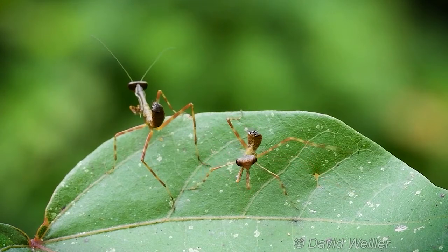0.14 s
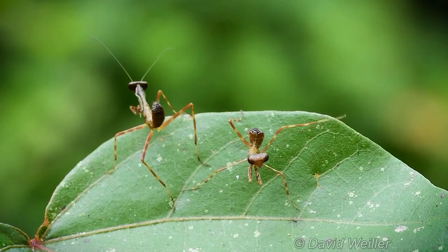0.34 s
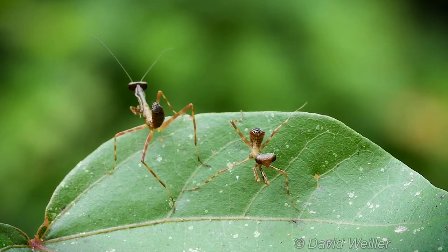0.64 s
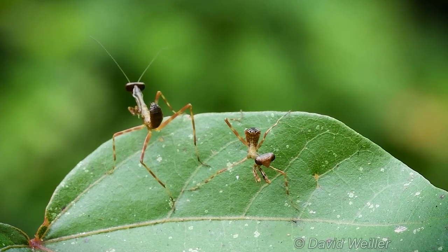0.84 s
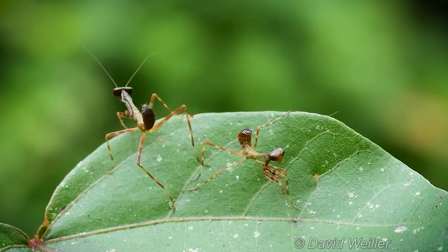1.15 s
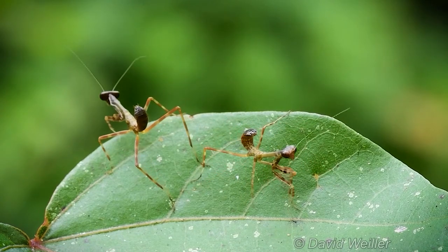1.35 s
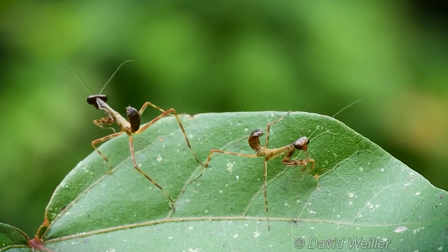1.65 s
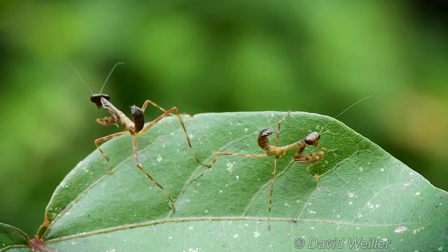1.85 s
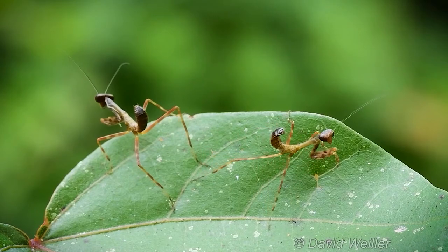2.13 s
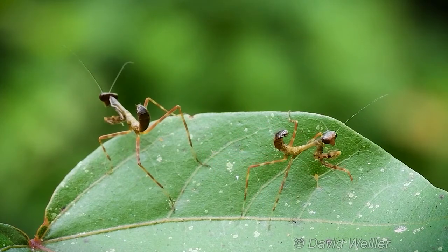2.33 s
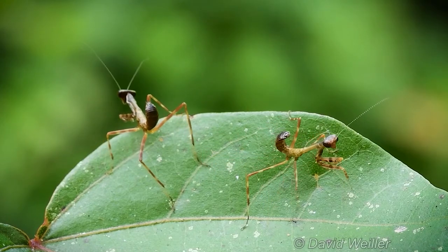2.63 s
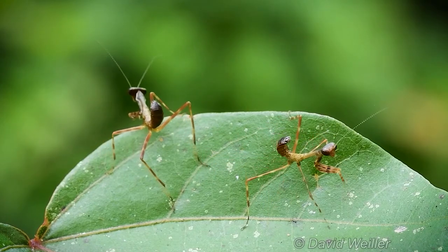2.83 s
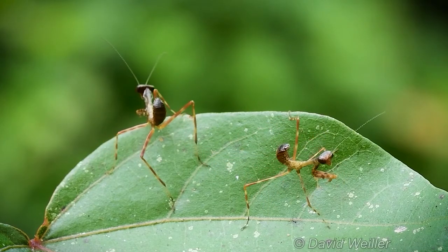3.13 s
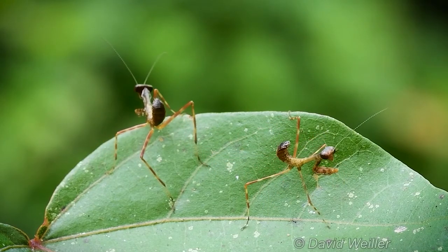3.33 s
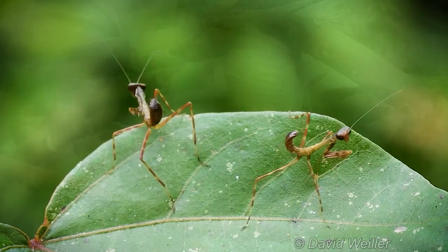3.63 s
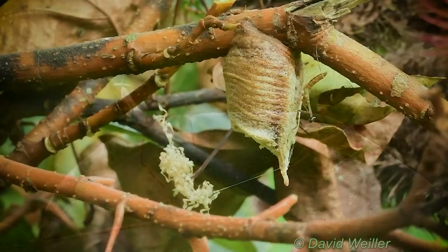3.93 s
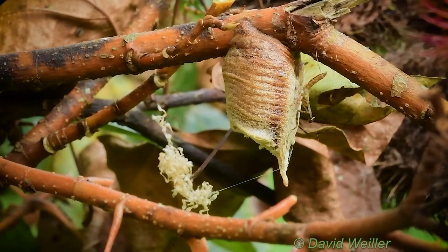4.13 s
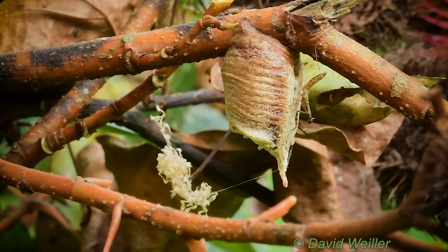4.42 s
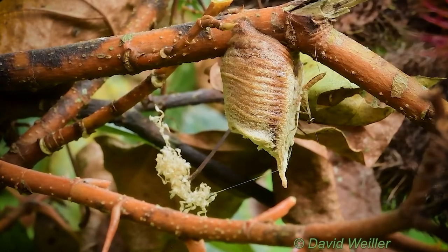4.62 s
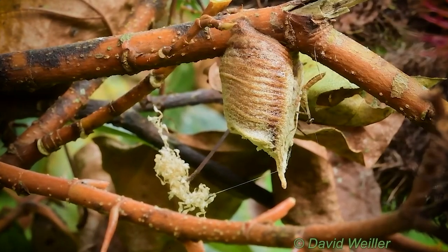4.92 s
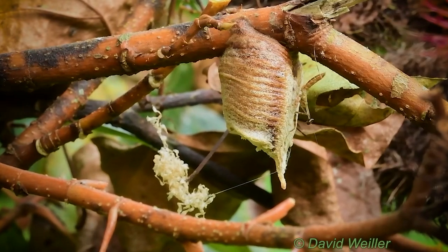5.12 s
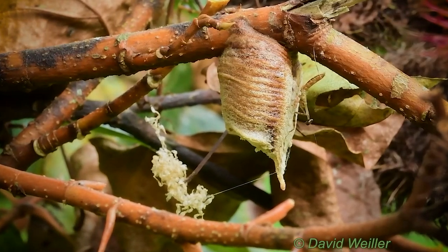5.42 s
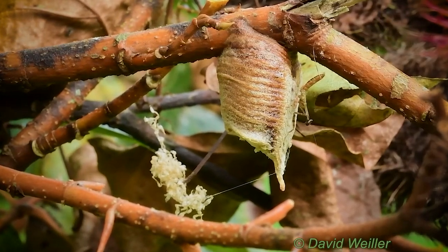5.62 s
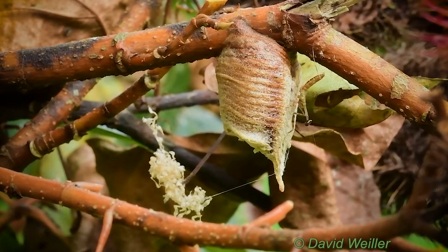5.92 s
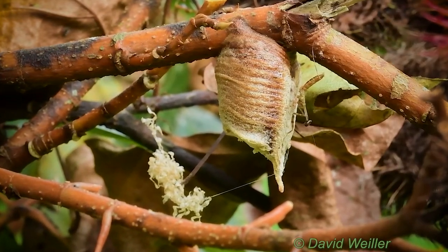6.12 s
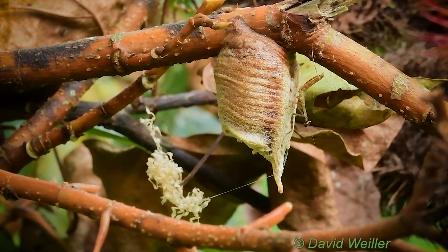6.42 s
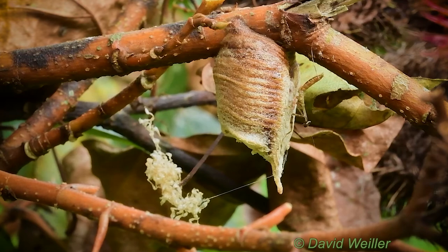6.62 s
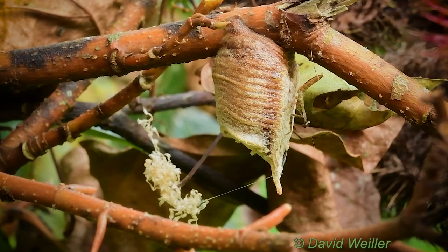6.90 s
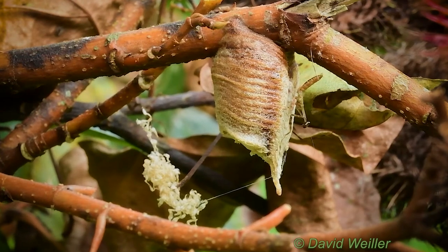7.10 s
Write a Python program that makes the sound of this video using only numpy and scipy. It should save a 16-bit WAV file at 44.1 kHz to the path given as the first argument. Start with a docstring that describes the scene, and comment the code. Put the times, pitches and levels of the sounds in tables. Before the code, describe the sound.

Quiet leafy hiss with faint insects. A harsh, loud bird call bursts out close to the microphone in the first second, followed by brief yelps; a quick throat rattle and more yelping come around three seconds. Behind it, a hoarse bird on the left chacks sparsely, then persistently, while mellow hoots, falling and rising whistles, buzzy notes and high frog trills echo through the trees to the end.

```python
"""Rainforest birds and frogs

A near bird yelps (rough harmonic voice), clicks (ringing noise bursts) and rasps (irregular pulses, air, squeal).
Further off to the left another bird repeats a hoarse chack: three yelps run together.
Around them: arched whistles of few partials, fluttering (phase-modulated) buzzes, frog trills (trains of
falling notes) and faint gliding slurs, with echoes, over filtered-noise hiss of leaves and insects.
Two narrow gaps sweep slowly up and down through the treble; the top is cut."""
import sys
import numpy as np
from scipy import signal
from scipy.fft import rfft, irfft, next_fast_len
from scipy.io import wavfile
from scipy.ndimage import uniform_filter1d

SR = 44100
rng = np.random.default_rng(int(sys.argv[2]) if len(sys.argv) > 2 else 0)


def materialize(psi):
    """Save the field psi as 16-bit PCM at rate SR to the path in sys.argv[1].

    A 1-D psi becomes a single channel; in a 2-D psi each row is a channel.
    """
    bounded = np.clip(np.atleast_2d(psi).T, -1, 1)
    quanta = np.round(bounded * 32767).astype(np.int16)
    wavfile.write(sys.argv[1], SR, quanta)


N = 319989

# forest hiss spectrum: (frequency [Hz], relative level [dB])
HISS_SPECTRUM = [(15, -57), (25, -20), (193, -15.5), (246, -17), (421, -9.5), (597, -17.5), (1240, -2),
                 (1410, -6), (1850, -6.5), (3000, -9.5), (3620, -9.5), (4610, -12.5), (5140, -13),
                 (6720, -16.5), (15500, -28)]
HISS_DB, HISS_WIDTH = -69, .35  # width: noise independent per side, relative to the common noise

# faint distant slurs: (start [s], length [s], first pitch [Hz], last pitch [Hz], level [dB])
SLURS = [(1.02, 0.068, 960, 820, -67), (1.842, .13, 2850, 3500, -64.5), (1.958, .2, 3420, 3520, -71.5),
         (2.263, 0.11, 3850, 3630, -64), (3.947, 0.081, 7340, 6650, -73.5), (4.0, 0.13, 4390, 4760, -73.5),
         (4.115, 0.034, 4480, 3820, -64.5), (4.125, .08, 7420, 6650, -75.5),
         (4.231, 0.092, 4270, 3960, -62), (4.388, 0.12, 4320, 4500, -68), (5.34, 0.071, 3060, 2110, -56),
         (6.998, .11, 2340, 2840, -68)]

# frog trills: (start [s], length [s], starting note rate [1/s], first pitch [Hz], last pitch [Hz],
# fall within a note [Hz], sharpness of a note's swell [power], level [dB], loudest point [share of length],
# fade towards the farther end [dB], left-right [dB])
TRILLS = [(2.89, .028, 75, 5730, 5670, 498, 4.7, -53, 0.46, 0, 4),
          (3.244, 0.26, 51, 7110, 7200, 199, 2.2, -60.5, 0.78, 8, 11),
          (4.247, 0.71, 35.1, 3526, 3883, 1000, 1.1, -57, 0.68, 7, 6.5),
          (6.326, .79, 40.3, 4280, 4106, 425, 3.7, -47.5, 0.12, 7, -8)]
TRILL_SLOWING = .05  # share of its rate lost by the end

# buzzing whistles: (start [s], length [s], pitch [Hz], flutter rate [Hz], final flutter depth [rad],
# level before fade [dB], left-right [dB])
BUZZES = [(3.567, 0.27, 3647, 310, 1.07, -45.5, 7.5), (3.617, .25, 3914, 42.4, 1.6, -52.5, 7),
          (5.51, 0.49, 4582, 328, 1.1, -47, -6.5)]

# whistling birds, one table each: (start [s], length [s], top pitch [Hz], crest [share of length], level [dB])
HOOTS = [(1.231, .17, 1370, .66, -42.5), (1.48, 0.13, 1342, 0.66, -43), (2.052, 0.116, 1356, 0.808, -40.5),
         (4.504, 0.15, 1353, 0.64, -37)]
FALLING_WHISTLES = [(1.854, .13, 1568, 0.35, -50.5), (5.135, .13, 1537, 0.21, -49),
                    (5.859, .14, 1495, 0.21, -49), (6.089, .13, 1245, 0.16, -67.5),
                    (6.471, .091, 1213, 0.19, -65.5), (6.83, 0.071, 1170, .3, -66)]
RISING_WHISTLES = [(4.193, 0.1, 1740, 0.5, -51), (4.813, 0.11, 1760, 0.76, -53.5),
                   (5.48, .11, 1773, 0.48, -56), (6.68, 0.16, 1785, 0.71, -57)]
# their partials: (multiple of the pitch, level [dB])
HOOT_PARTIALS = [(1, -3.5), (2, -23), (3, -34)]
FALLING_PARTIALS = [(1, 4), (2, -19), (3, -39.5)]
RISING_PARTIALS = [(.5, -23.5), (1, -3), (1.5, -17.5), (2, -19.5), (2.5, -22)]

# near bird's yelps, one arch of pitch each: (start [s], length [s], foot [Hz], top [Hz], crest [share of length],
# level [dB], attack [s], release [s], overtones at the crest [dB], overtones on the flanks [dB],
# roughness at the top [0-1])
YELPS = [ (0.212, 0.082, 960, 2092, 0.84, -34.5, 0.043, 0.0046, -5, 7, 0.1),
         (.89, 0.041, 700, 1528, 0.48, -16.5, 0.024, 0.021, -27.5, -7, 0.04),
         (.945, 0.039, 762, 1240, 0.43, -20, 0.0052, 0.0076, 8.5, 21, 0.3),
         (2.789, 0.047, 1642, 1799, .78, -22.5, 0.065, 0.0061, 1, 1, 0),
         (3.124, 0.07, 853, 1760, .6, -20, .021, 0.023, 6.5, 5.5, 0.09)]
# the three yelps of a chack: columns as above; start and level relative to the chack's,
# start and length before its stretch
CHACK_PARTS = [ (-.005, .038, 879.6, 1338, .55, -1.64, 0.013, 0.0035, 3, 9.6, 0.036),
               (.028, .025, 952.5, 1474, 0.518, 1.8, 0.0058, .006, 9.6, 12, 0.12),
               (.048, .058, 1036, 1420, .13, -2.1, 0.004, 0.043, 2.8, 5, .3)]
# chacks: (start [s], level [dB], time stretch [ratio], beak resonance [Hz])
CHACKS = [(1.289, -48.5, 1.014, 2300), (2.189, -53, 0.91, 3232), (2.571, -52.5, 0.93, 3240),
          (2.919, -54.5, 0.85, 3200), (4.537, -47, 1.02, 2250), (4.727, -46, 0.93, 2280),
          (5.066, -45, 1.036, 2200), (5.226, -46, 0.95, 2400), (5.312, -51, 0.85, 2970),
          (5.393, -46, 1.05, 3100), (5.579, -45.5, 1, 2960), (5.761, -45, 1.01, 2880),
          (5.961, -45, 0.92, 2914), (6.245, -45, 0.93, 3180), (6.455, -63.5, 1.06, 3320),
          (6.781, -44.5, 0.9, 2920), (7.156, -44.5, 1.02, 3300)]
FULL_CHACK_DB = -44
DULLING_DB_PER_OCTAVE = .45  # slope lost per dB below a full chack
CHACK_AIR_DB = -15

SWELL_POWER, RELEASE_POWER = 1.7, 1.67  # curvature of a yelp's attack and release
FLANK_SHARE = .44  # share of the arch's height over which the flank overtones come in
FLANK_ROUGHNESS_PER_OCTAVE = .33  # gained below the top
# register break on the rise: place [share of the rise], half width [s], changes per octave from foot to top
BREAK_AT, BREAK_S = .6, .0027
BREAK_DIP_DB, BREAK_ROUGHNESS, BREAK_OVERTONES_DB = 4, .62, 2.5
# one yelp ends by cracking into a hoarse scrap
CRACK_AT_S, CRACK_S, CRACK_HZ, CRACK_DB, CRACK_FADE_DB = 2.832, .025, 2120, -34, 14.5

# runs of throat clicks: (start [s], spacing [s], clicks [count], first level [dB], last level [dB])
CLICK_RUNS = [(.412, .0255, 3, -29.5, -25), (3.027, .0115, 9, -49, -23)]

# effort of the rasp: (time [s], level before RASP_GAIN_DB [dB])
RASP_EFFORT = [(0.46, -39.5), (0.466, -34), (0.484, -33.5), (0.528, -29), (0.648, -28), (0.666, -25),
               (0.72, -32), (0.79, -51.5)]
RASP_GAIN_DB = 1.5
RASP_PULSE_HZ, RASP_SWING_HZ, RASP_SWING_S = 463.5, 58, .107  # mean pulse rate, swing, swing period
# clear tones within the rasp: (start [s], length [s], mid-tone pitch [Hz], level [dB])
LOCKS = [(0.521, 0.028, 914.7, -26), (0.643, 0.034, 906, -27.5)]
# their harmonics: (multiple of the pitch, relative level [dB])
LOCK_HARMONICS = [(1, -12), (2, -10.5), (3, 0), (4, -7), (6, -3)]

# throat colours: (frequency [Hz], relative level [dB])
FAR_THROAT = [(600, -35), (900, 3.5), (1250, 8.5), (1600, -1.5), (2100, 6), (2900, 2.5), (3700, -5.5),
              (4500, -6), (5300, -8), (6400, -2), (7600, -17), (10000, -57)]
NEAR_THROAT = [(400, -21.5), (800, -10.5), (1300, -4), (2400, -9), (3500, -8), (4100, -7), (4800, -4.5),
               (5500, -4), (6800, -9), (8500, -22.5), (11000, -25), (15000, -30.5)]
CLICK_THROAT = [(400, -38.5), (750, -28.5), (1150, 4.5), (1900, -0.5), (2400, -4), (2900, 8.5), (3450, 4),
                (4000, -10.5), (4800, -1.5), (6500, -16), (9000, -29), (15000, -43)]
RASP_THROAT = [(150, -82), (250, -64), (457, -45.5), (837, -33), (1180, -22), (1360, -19), (2160, -13.5),
               (2660, -17.5), (3270, -6.5), (4620, -13.5), (5990, -9.5), (6760, -21.5), (12400, -42.5),
               (14200, -43.5), (15500, -95)]

# leaves ringing on around the near bird: (frequency [Hz], width [Hz], level [dB])
LEAF_RINGS = [(2200, 30, -15), (3500, 20, -16), (4170, 16, -1), (4850, 22, -4)]
CUTOFF_HZ = 15700


def from_db(db):
    """Decibels to gain."""
    return 10 ** (np.asarray(db) / 20)


def rms_one(x):
    """Scale to unit power."""
    return x / np.sqrt(np.mean(x ** 2) + 1e-20)


def gain_at(spectrum, hz):
    """Gain of a spectrum table at any frequency, interpolated over log frequency."""
    table_hz, table_db = np.transpose(spectrum)
    return from_db(np.interp(np.log(np.maximum(hz, 1)), np.log(table_hz), table_db))


def colour(x, spectrum):
    """Filter by a spectrum table; unit power."""
    length = x.shape[-1]
    size = next_fast_len(length)
    gain = gain_at(spectrum, np.fft.rfftfreq(size, 1 / SR))
    return rms_one(irfft(rfft(x, size) * gain, size)[..., :length])


def wobble(count, rate_hz):
    """Smooth random motion of spread 1: noise through a double-pole low-pass."""
    pole = np.exp(-2 * np.pi * rate_hz / SR)
    settle = SR // 10
    noise = rng.standard_normal(count + settle)
    return rms_one(signal.lfilter([1], [1, -2 * pole, pole * pole], noise)[settle:])


def progress(length_s):
    """Ramp from 0 to 1 along a note."""
    return np.linspace(0, 1, int(length_s * SR))


def phase_of(hz):
    """Running phase [rad] of a pitch curve."""
    return 2 * np.pi * np.cumsum(hz) / SR


def add(track, start_s, sound, pan_db=0):
    """Mix a mono sound into a stereo track; positive pan is left."""
    at = max(round(start_s * SR), 0)
    part = sound[:max(N - at, 0)]
    sides = from_db(np.array([[pan_db], [-pan_db]]) / 2)
    track[:, at:at + len(part)] += part * sides / sides.mean()


def background():
    """Soft noise hiss of foliage, with a thin band of distant insects."""
    hiss_noise = rng.standard_normal(N) + HISS_WIDTH * rng.standard_normal((2, N))
    hiss = colour(hiss_noise, HISS_SPECTRUM)
    insect_band = [(5000, -58), (5750, -12), (5900, -5.5), (6050, -22.0), (6900, -70.0)]
    insects = colour(rng.standard_normal((2, N)), insect_band)
    hiss_db = HISS_DB + .5 * wobble(N, 3.4)
    return hiss * from_db(hiss_db) + insects * from_db([[-83], [-88]])


def slurs():
    """Thin sine notes gliding from one pitch to another, deep in the forest."""
    out = np.zeros((2, N))
    for start_s, length_s, first_hz, last_hz, level_db in SLURS:
        u = progress(length_s)
        hz = first_hz * (last_hz / first_hz) ** u
        wave = np.sin(phase_of(hz * (1 + .0028 * wobble(len(u), 80))))
        swell = np.sin(np.pi * u)
        add(out, start_s, np.sqrt(2) * from_db(level_db) * swell * wave, pan_db=4.5)
    return out


def trills():
    """Frogs: fast trains of short notes, each falling in pitch; a train swells, fades and slows a little."""
    out = np.zeros((2, N))
    for (start_s, length_s, rate_hz, first_hz, last_hz, fall_hz, sharpness,
         level_db, crest, fade_db, pan_db) in TRILLS:
        along = progress(length_s)
        u = np.cumsum(rate_hz * (1 - TRILL_SLOWING * along)) / SR % 1  # place within a note
        hz = first_hz + (last_hz - first_hz) * along
        wave = np.sin(phase_of(hz + fall_hz * (.3 - u ** 2) + 25 * wobble(len(u), 150)))
        note = wave * np.abs(np.sin(np.pi * u)) ** sharpness
        from_crest = np.abs(along - crest) / max(crest, 1 - crest)
        swell = from_db(level_db - fade_db * from_crest) * signal.windows.tukey(len(u), .08)
        add(out, start_s, np.sqrt(2) * swell * note, pan_db)
    return out


def buzzes():
    """Held whistles whose phase-modulating flutter deepens as they fade."""
    out = np.zeros((2, N))
    for start_s, length_s, hz, flutter_hz, depth_rad, level_db, pan_db in BUZZES:
        u = progress(length_s)
        flutter = phase_of(flutter_hz * (1 + .085 * wobble(len(u), 40)))
        carrier = phase_of(hz * (1 + .005 * wobble(len(u), 30)))
        wave = np.sin(carrier + depth_rad * u * np.sin(flutter))
        swell = signal.windows.tukey(len(u), .35) * from_db(-8 * u + .94 * wobble(len(u), 40))
        add(out, start_s, np.sqrt(2) * from_db(level_db) * swell * wave, pan_db)
    return out


def arch(u, first_hz, top_hz, last_hz, crest, bend):
    """Pitch along a note (u from 0 to 1): it rises, rounds off at the crest and falls away."""
    crest = np.clip(crest, .05, .95)
    rise = np.sin(np.pi / 2 * np.minimum(u / crest, 1))
    fall = (np.maximum(u - crest, 0) / (1 - crest)) ** bend
    return first_hz + (top_hz - first_hz) * rise - (top_hz - last_hz) * fall


def whistler(notes, partials, first, last, bend, lateness, pan_db):
    """Nearly pure arched notes that swell and stop short; first and last are shares of the top pitch."""
    out = np.zeros((2, N))
    for start_s, length_s, top_hz, crest, level_db in notes:
        u = progress(length_s)
        hz = arch(u, first * top_hz, top_hz, last * top_hz, crest, bend)
        phase = phase_of(hz * (1 + .0015 * wobble(len(u), 65)))
        # multiples held to whole or half harmonics
        wave = sum(from_db(db) * np.sin(round(2 * k) / 2 * phase) for k, db in partials)
        swell = np.abs(np.sin(np.pi * u ** lateness)) ** .46
        add(out, start_s, np.sqrt(2) * from_db(level_db) * swell * wave, pan_db)
    return out


def whistles():
    """Three birds on the left: one hoots on an almost level pitch, one slides down, one swoops up."""
    hoots = whistler(HOOTS, HOOT_PARTIALS, first=.92, last=.98, bend=1.54, lateness=2.42, pan_db=5.3)
    falling = whistler(FALLING_WHISTLES, FALLING_PARTIALS,
                       first=.87, last=.91, bend=1.25, lateness=2.36, pan_db=7)
    rising = whistler(RISING_WHISTLES, RISING_PARTIALS,
                      first=.79, last=.94, bend=3.3, lateness=1.26, pan_db=13.5)
    return hoots + falling + rising


def syrinx(controls, throat, jitter, flutter_hz, doubling, slope_db, air_db, count=20):
    """A harmonic voice; roughness shakes its pitch and doubles its period, which brings in half harmonics."""
    hz, level_db, overtone_db, rough = controls
    size = len(hz)
    hz = uniform_filter1d(hz, SR // 300) * (1 + jitter * rough ** 2 * wobble(size, flutter_hz))
    k = np.arange(2, count + 2)[:, None] / 2  # harmonic number, in halves from 1
    weight = gain_at(throat, k * hz) * (k * hz < SR / 2)
    weight = weight * np.where(k % 1, doubling * rough, 1)
    tilt_db = slope_db * np.log2(np.maximum(k / 2, 1))
    weight = weight * from_db(np.minimum(2 * (k - 1), 1) * overtone_db + tilt_db)
    weight = weight / np.sqrt(np.sum(weight ** 2, axis=0) / 2)
    # the higher a harmonic, the more its phase frays
    fray = np.clip(.43 * (k - 1.5), 0, 1.5) * np.array([wobble(size, 170) for _ in k])
    phase = k * phase_of(hz) + fray + rng.uniform(0, 2 * np.pi, k.shape)
    wave = np.sum(weight * np.sin(phase), axis=0)
    air = colour(rng.standard_normal(size), throat) * from_db(air_db) * np.sqrt(np.abs(rough))
    shake = 1 + .31 * rough * wobble(size, 250)
    return (wave + air) * from_db(level_db) * shake * signal.windows.tukey(size, .06)


def yelp(length_s, foot_hz, top_hz, crest, level_db, attack_s, release_s, crest_db, flank_db, rough, bend):
    """Pitch, level, overtones and roughness of a yelp: rougher down the flanks, with a register break."""
    u = progress(length_s)
    hz = arch(u, foot_hz, top_hz, foot_hz, crest, bend)
    slack = (top_hz - hz) / (top_hz - foot_hz)
    edges = np.minimum([u * length_s / attack_s, (1 - u) * length_s / release_s], 1)
    opening, closing = np.sin(np.pi / 2 * edges)
    swell_db = 20 * np.log10(opening ** SWELL_POWER * closing ** RELEASE_POWER + 1e-6)
    # for a moment on the way up the voice dips, roughens and brightens; wide leaps break most
    breaking = np.exp(-((u - BREAK_AT * crest) * length_s / BREAK_S) ** 2) * np.log2(top_hz / foot_hz)
    overtone_db = crest_db + (flank_db - crest_db) * np.minimum(slack / FLANK_SHARE, 1)
    flank_roughness = FLANK_ROUGHNESS_PER_OCTAVE * np.log2(top_hz / hz)
    return (hz,
            level_db + swell_db - BREAK_DIP_DB * breaking,
            overtone_db + BREAK_OVERTONES_DB * breaking,
            rough + flank_roughness + BREAK_ROUGHNESS * breaking)


def chacks():
    """A clean rise, a rough break and a hoarse falling tail, varied each time; the open beak rings along."""
    out = np.zeros((2, N))
    for start_s, level_db, stretch, beak_hz in CHACKS:
        slope_db = -4.5 + DULLING_DB_PER_OCTAVE * (level_db - FULL_CHACK_DB)  # softer is duller
        for after_s, length_s, *note in CHACK_PARTS:
            hz, shape_db, overtone_db, rough = yelp(length_s * stretch, *note, bend=1.3)
            chance = rng.standard_normal(4)
            controls = (hz * (1 + .046 * chance[0]), shape_db + 1.5 * chance[1],
                        overtone_db + 6.3 * chance[2], rough)
            call = syrinx(controls, FAR_THROAT, jitter=.13, flutter_hz=273, doubling=3.27,
                          slope_db=slope_db, air_db=CHACK_AIR_DB)
            call = call + .96 * signal.lfilter(*signal.iirpeak(beak_hz, 6, fs=SR), call)
            part_s = start_s + after_s * stretch + .0012 * chance[3]
            add(out, part_s, from_db(level_db) * call, pan_db=6.0)
    return out


def clicks():
    """Runs of noise bursts that each ring for a few milliseconds in the throat."""
    out = np.zeros((2, N))
    t = np.arange(SR // 40) / SR
    snap = np.minimum(t / .001, 1) * (.8 * np.exp(-t / .0053) + .18 * np.exp(-t / .019))
    for start_s, spacing_s, count, first_db, last_db in CLICK_RUNS:
        # gain grows as the square of a straight ramp
        strengths = np.linspace(from_db(first_db / 2), from_db(last_db / 2), round(count)) ** 2
        for i, strength in enumerate(strengths):
            burst = colour(rng.standard_normal(len(t)), CLICK_THROAT)
            add(out, start_s + i * spacing_s, strength * burst * snap)
    return out


def crack():
    """Pitch, level, overtones and roughness of a voice that has broken: wholly rough and fading fast."""
    u = progress(CRACK_S)
    return np.full_like(u, CRACK_HZ), CRACK_DB - CRACK_FADE_DB * u, np.zeros_like(u), np.ones_like(u)


def yelps():
    """Arched notes of the near bird's syrinx, and the crack that ends one of them."""
    out = np.zeros((2, N))
    calls = [(start_s, yelp(*note, bend=2.3)) for start_s, *note in YELPS]
    for start_s, controls in calls + [(CRACK_AT_S, crack())]:
        voice = syrinx(controls, NEAR_THROAT, jitter=.064, flutter_hz=295.7, doubling=.46,
                       slope_db=-17.5, air_db=-21.0)
        add(out, start_s, voice)
    return out


def near_bird():
    """Yelps and clicks, thinned by a high-pass."""
    high_pass = signal.butter(4, 740, "high", fs=SR, output="sos")
    return signal.sosfilt(high_pass, yelps() + clicks())


def lock_tones(out):
    """Clear harmonic tones mixed in where the two sides of the syrinx lock; the rasp beneath dips."""
    for start_s, length_s, mid_hz, level_db in LOCKS:
        u = progress(length_s)
        gate = signal.windows.tukey(len(u), .3)
        at = round(start_s * SR)
        phase = phase_of(mid_hz * (1 + .03 * (2 * u - 1) ** 2 + .011 * wobble(len(u), 300)))
        tone = rms_one(sum(from_db(db) * np.sin(round(k) * phase) for k, db in LOCK_HARMONICS))
        out[:, at:at + len(u)] *= 1 - .3 * gate
        add(out, start_s, tone * from_db(level_db) * gate)


def rasp():
    """One side of the syrinx gives irregular pulses, the other a warbling squeal; twice a clear tone joins."""
    out = np.zeros((2, N))
    times_s, levels_db = np.transpose(RASP_EFFORT)
    t = np.arange(times_s[0], times_s[-1], 1 / SR)
    level_db = np.interp(t, times_s, levels_db)
    n = np.arange(len(t))
    hz = RASP_PULSE_HZ + RASP_SWING_HZ * np.cos(2 * np.pi * n / SR / RASP_SWING_S)
    phase = phase_of(hz * (1 + .2 * wobble(len(n), 350)))
    pulses = np.diff(phase // (2 * np.pi), prepend=0) * from_db(1.2 * rng.standard_normal(len(n)))
    air = rng.standard_normal(len(n)) * (1 + np.cos(phase))
    throb = np.sin(phase_of(135 * (1 + .16 * wobble(len(n), 40))))
    warble = phase_of(1090 * (1 + .083 * throb + .035 * wobble(len(n), 300)))
    squeal = sum(np.sin(k * warble) for k in range(2, 7))
    source = rms_one(pulses) + .71 * rms_one(air) + .59 * rms_one(squeal)
    # a ground reflection whose delay wanders as the head moves makes shifting bands
    delay_samples = SR / (1100 * (1 + .15 * wobble(len(n), 16)))
    source = source + .6 * np.interp(n - delay_samples, n, source)
    # a low growl comes through whenever the pulse rate sags
    sagging = uniform_filter1d((np.gradient(hz) < 0) * 1.0, SR // 80)
    growl = from_db(-30.5) * sagging * np.sin(phase_of(hz * (1.06 + .11 * wobble(len(n), 120))))
    voice = colour(source * (1 + .07 * throb), RASP_THROAT) + growl
    effort = from_db(RASP_GAIN_DB + level_db) * signal.windows.tukey(len(n), .02)
    add(out, times_s[0], voice * effort)
    lock_tones(out)
    return out


def close_by(x, lag_s, twist_hz, twist_width_hz, twist_rad, pan_db):
    """Leaves ring along with the near bird; the right side lags the left, most of all in one band."""
    rung = x
    for ring_hz, width_hz, db in LEAF_RINGS:
        resonator = signal.iirpeak(ring_hz, ring_hz / width_hz, fs=SR)
        rung = rung + from_db(db) * signal.lfilter(*resonator, x + 1e-18)
    size = next_fast_len(N)
    hz = np.fft.rfftfreq(size, 1 / SR)
    lag_rad = 2 * np.pi * hz * lag_s + twist_rad * np.exp(-((hz - twist_hz) / twist_width_hz) ** 2)
    right = irfft(rfft(rung[1], size) * np.exp(-1j * lag_rad), size)[:N]
    return np.array([rung[0] * from_db(pan_db / 2), right * from_db(-pan_db / 2)])


def forest(x, leaves_db, leaves_t60_s, trunks_db, trunks_t60_s):
    """Nearby leaves scatter a quick cloud of echoes; distant trunks return a tail; both decaying noise."""
    t = np.arange(int(1.5 * SR)) / SR
    spectrum = [(400, -11.0), (1200, -5.0), (5500, 11.5), (9000, -3.5), (15000, -16.5)]
    echoes = 0
    for level_db, t60_s in ((leaves_db, leaves_t60_s), (trunks_db, trunks_t60_s)):
        scatter = rng.standard_normal(len(t)) + .5 * rng.standard_normal((2, len(t)))
        cloud = colour(scatter, spectrum) * from_db(-60 * t / t60_s) * (t > .003)
        echoes = echoes + from_db(level_db) * cloud / np.sqrt(np.sum(cloud ** 2) / 2)
    return x + signal.fftconvolve(x, echoes, axes=1)[:, :N]


def scene():
    """The near bird is almost dry; the rest is wrapped in the forest, whistles and slurs ringing longest."""
    clear = forest(whistles() + slurs(), leaves_db=-27.5, leaves_t60_s=.9, trunks_db=-7.5, trunks_t60_s=2.3)
    frogs = forest(trills(), leaves_db=-12.5, leaves_t60_s=.18, trunks_db=-32.0, trunks_t60_s=.58)
    buzzing = forest(buzzes(), leaves_db=-18, leaves_t60_s=.15, trunks_db=-25, trunks_t60_s=.9)
    hoarse = forest(chacks(), leaves_db=-7.5, leaves_t60_s=.12, trunks_db=-19.5, trunks_t60_s=1.5)
    bird = close_by(near_bird() + rasp(), lag_s=.000018, twist_hz=3750, twist_width_hz=330,
                    twist_rad=1.15, pan_db=-.7)
    near = forest(bird, leaves_db=-22, leaves_t60_s=.24, trunks_db=-38, trunks_t60_s=.9)
    return background() + clear + frogs + buzzing + hoarse + near


def sweeping_gaps(x, low_hz, high_hz, top_s, period_s, apart_hz, width, depth_db, size=512):
    """Two narrow gaps glide up and down the treble side by side; width is a share of their centre."""
    overlap = size - size // 4
    hz, s, frames = signal.stft(x, SR, nperseg=size, noverlap=overlap)
    centre_hz = low_hz * (high_hz / low_hz) ** (np.cos(np.pi * (s - top_s) / period_s) ** 2)
    distance = (np.abs(hz[:, None] - centre_hz) - apart_hz / 2) / (width * centre_hz)
    gain = from_db(depth_db * np.exp(-distance ** 2))
    return signal.istft(frames * gain, SR, nperseg=size, noverlap=overlap)[1][:, :N]


def record(dry):
    """The treble hollows out in a slow sweep, and the top is cut."""
    swept = sweeping_gaps(dry, low_hz=4356, high_hz=12400, top_s=1.946, period_s=4.03,
                          apart_hz=1782, width=.043, depth_db=-20)
    low_pass = signal.ellip(12, .1, 80, CUTOFF_HZ, fs=SR, output="sos")
    return signal.sosfilt(low_pass, swept)


dry = scene()
out = record(dry)
materialize(out)
```